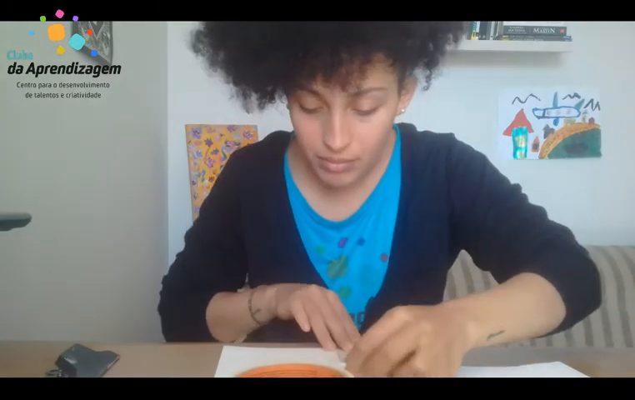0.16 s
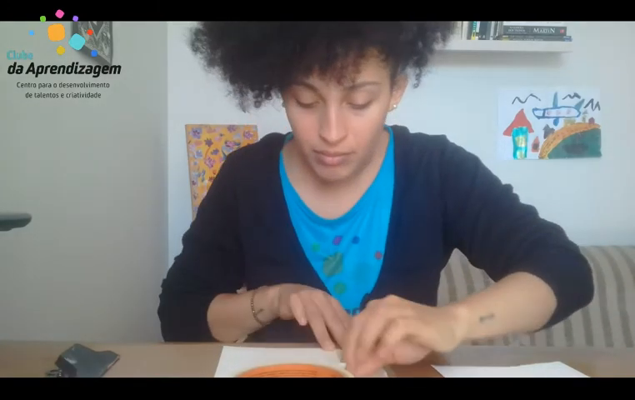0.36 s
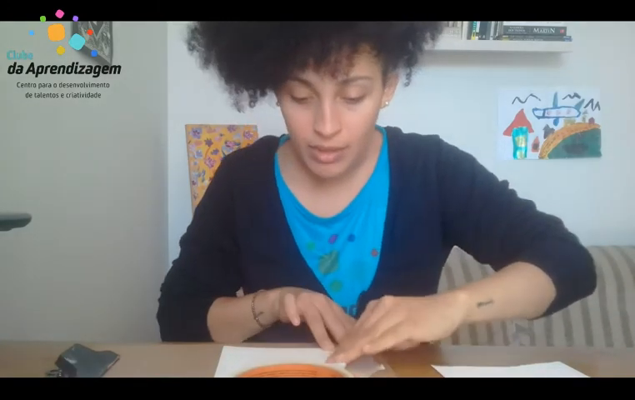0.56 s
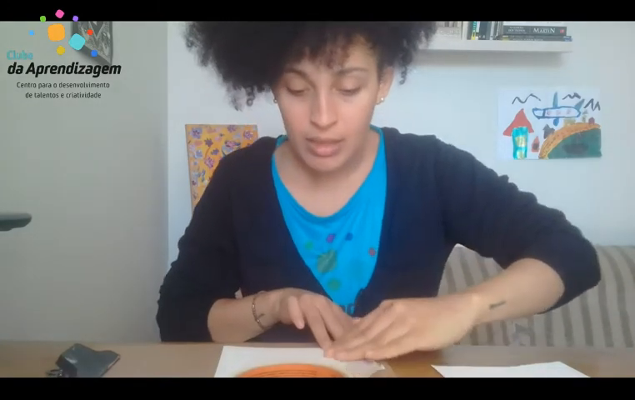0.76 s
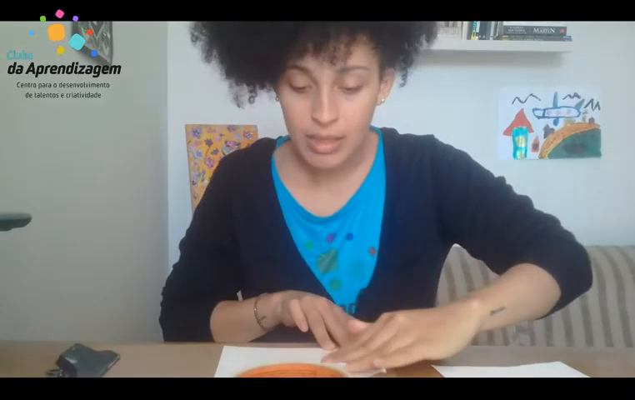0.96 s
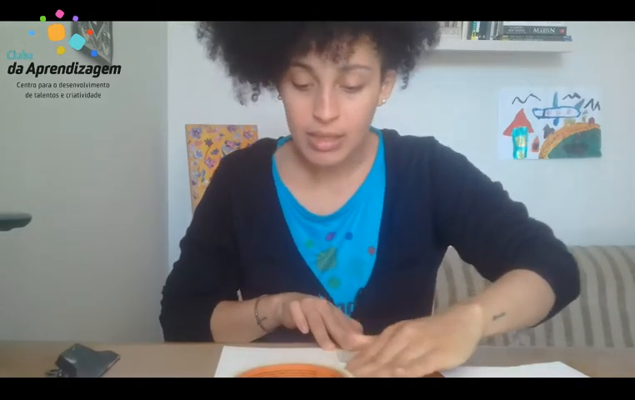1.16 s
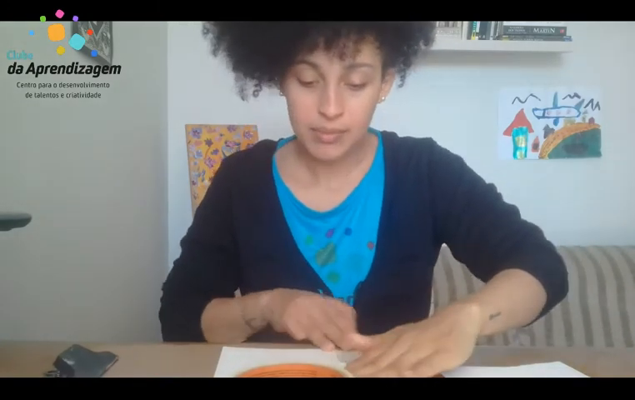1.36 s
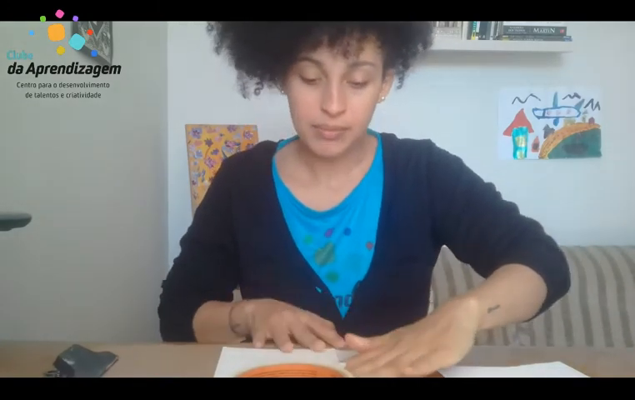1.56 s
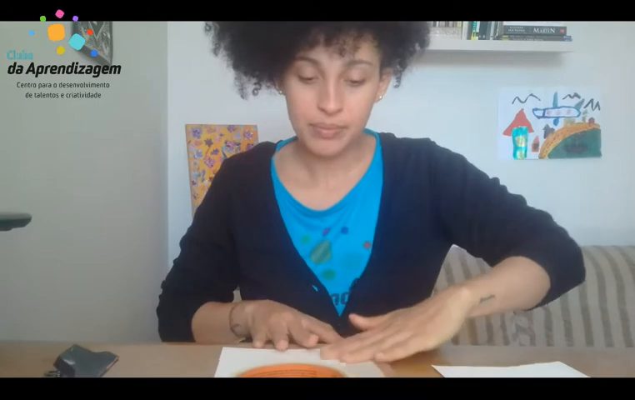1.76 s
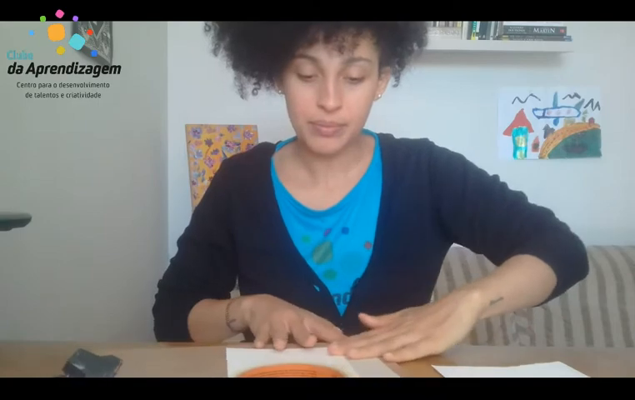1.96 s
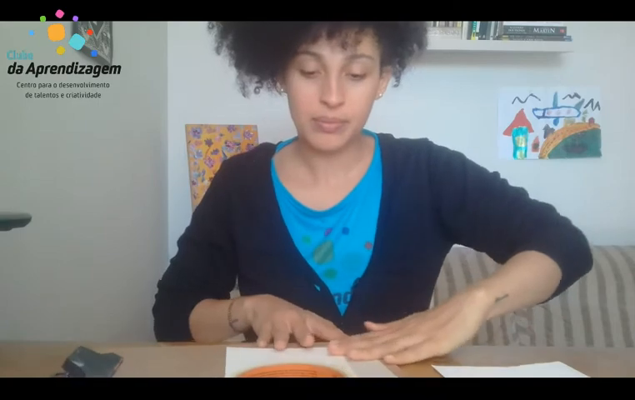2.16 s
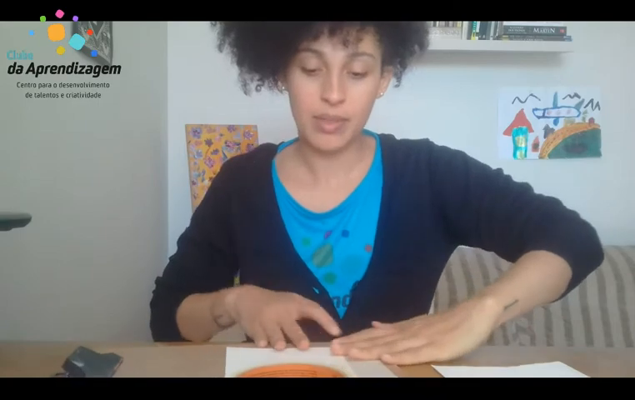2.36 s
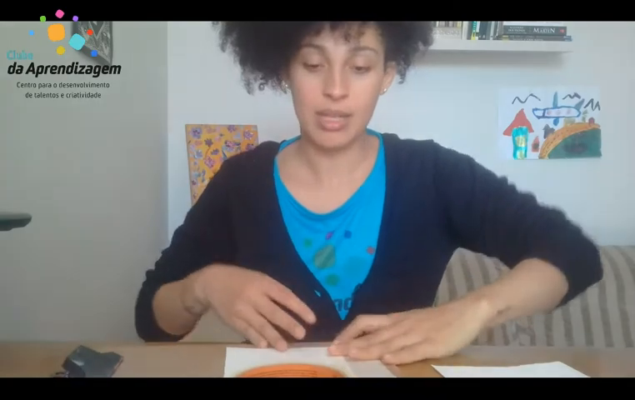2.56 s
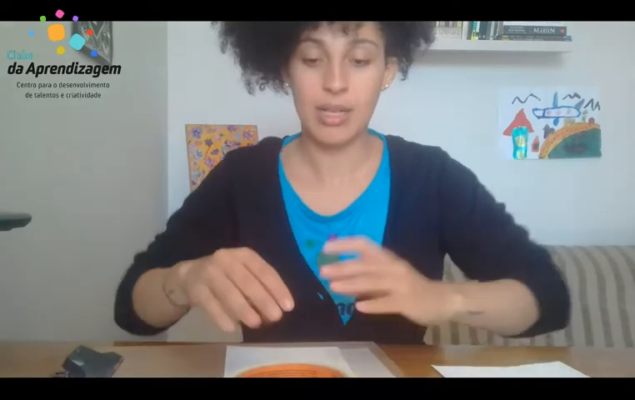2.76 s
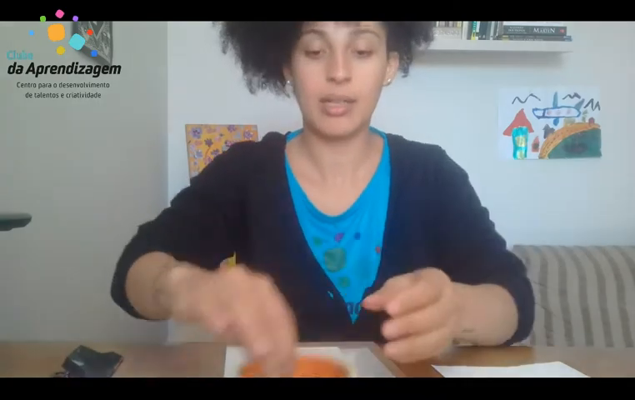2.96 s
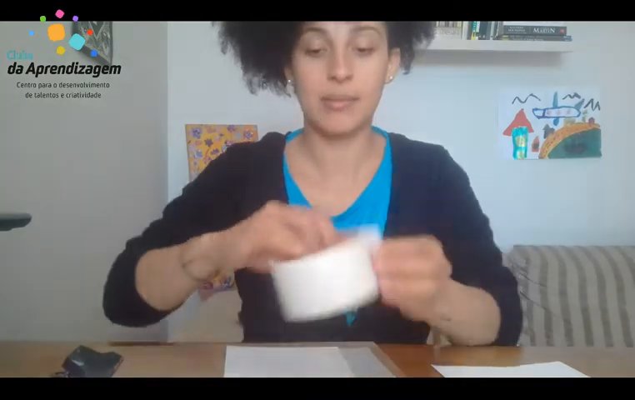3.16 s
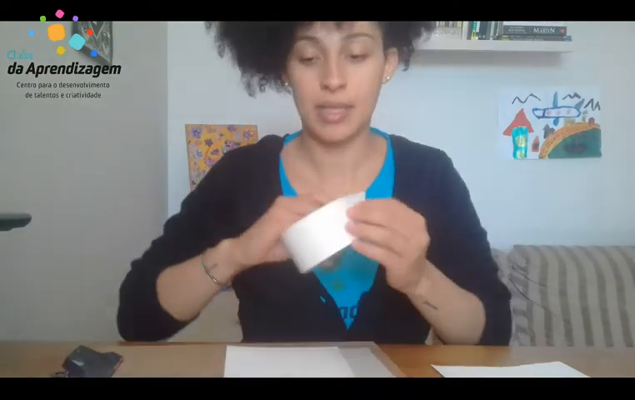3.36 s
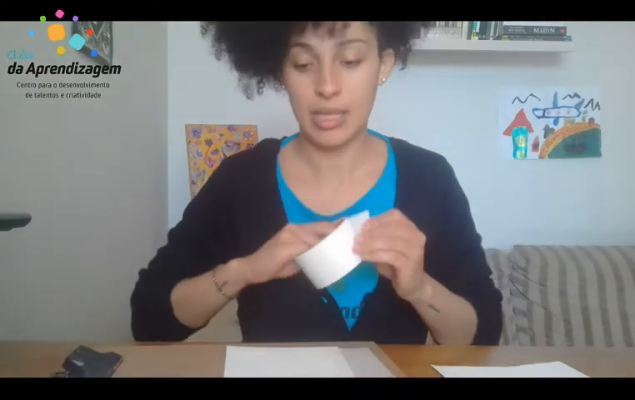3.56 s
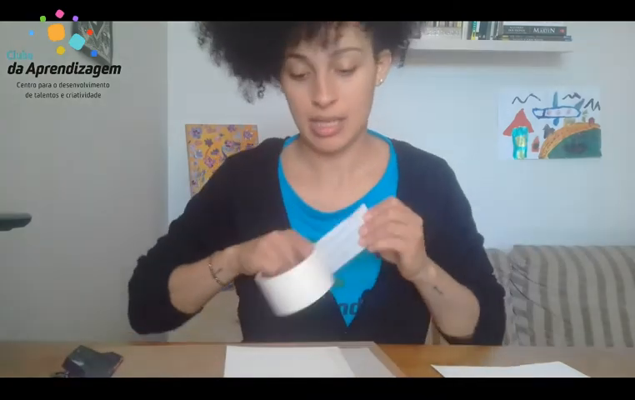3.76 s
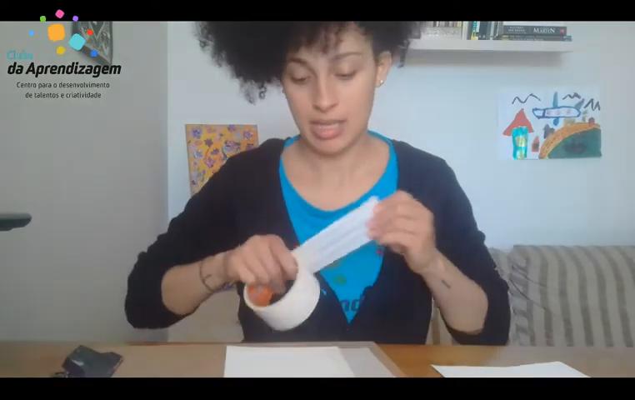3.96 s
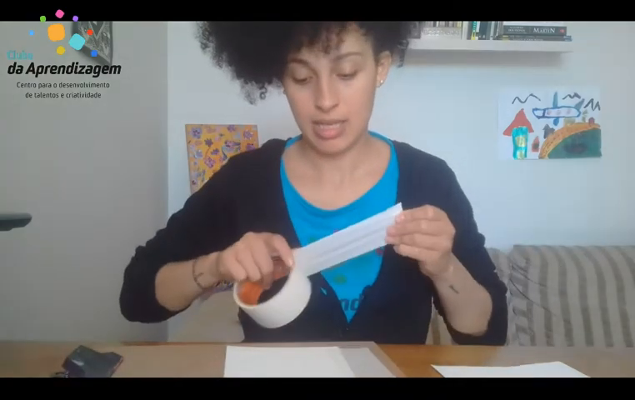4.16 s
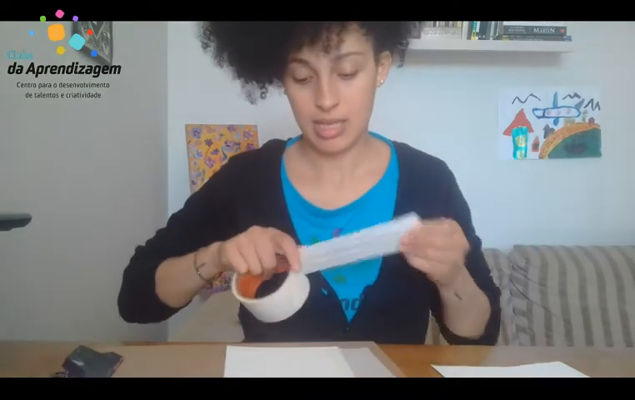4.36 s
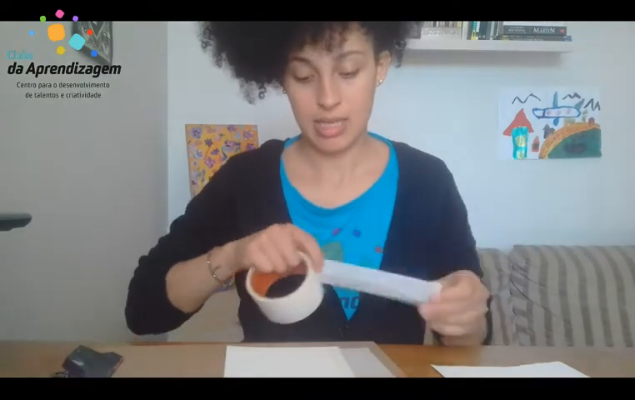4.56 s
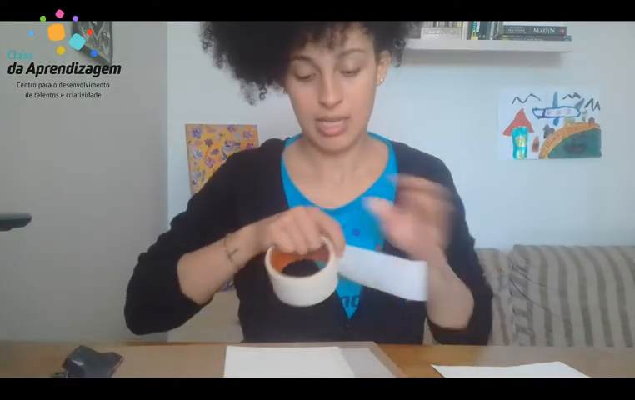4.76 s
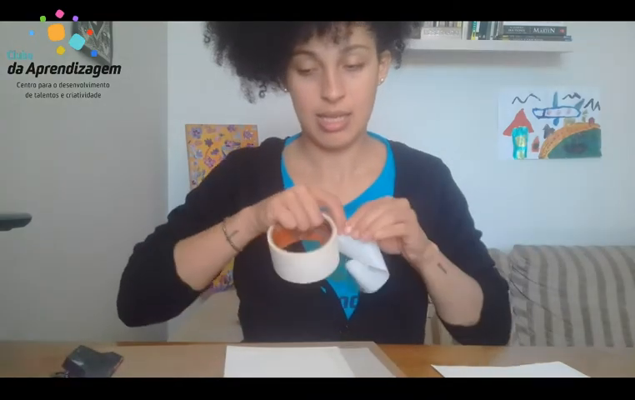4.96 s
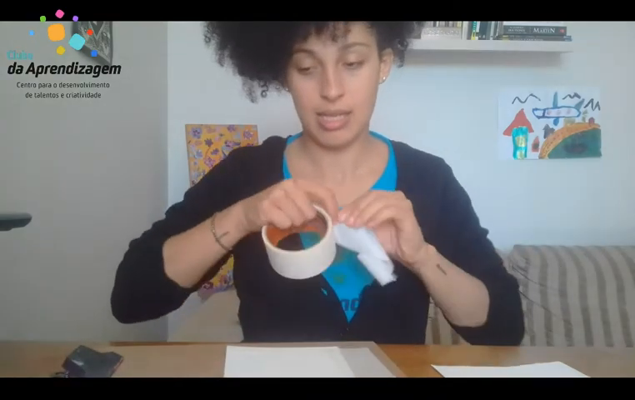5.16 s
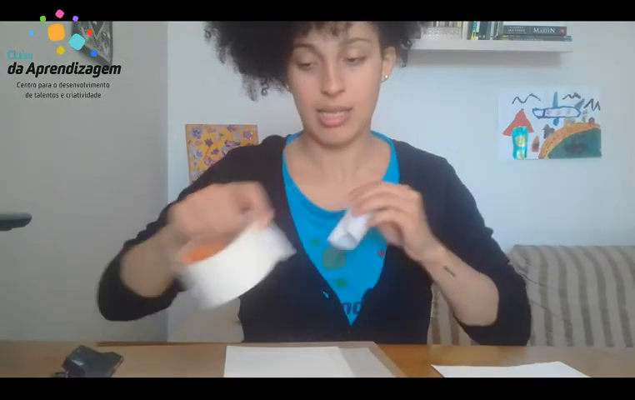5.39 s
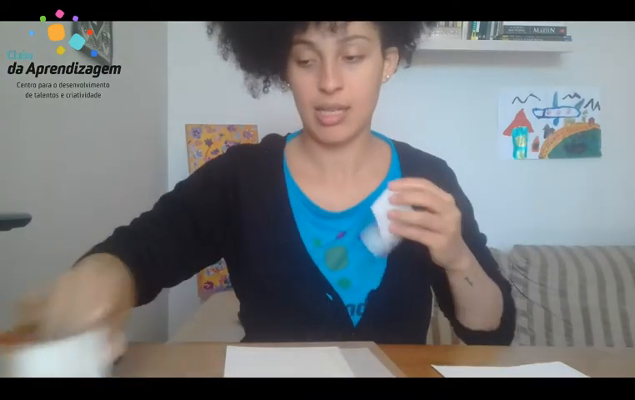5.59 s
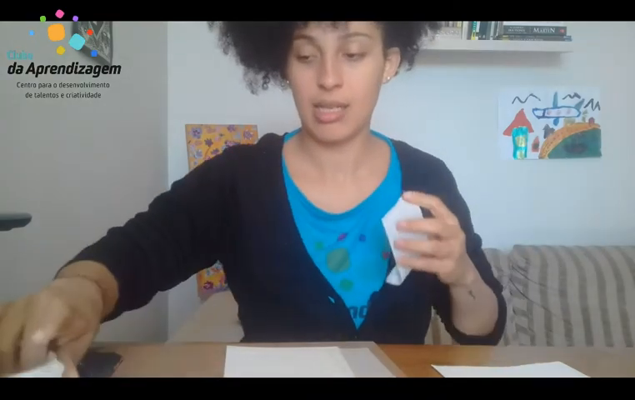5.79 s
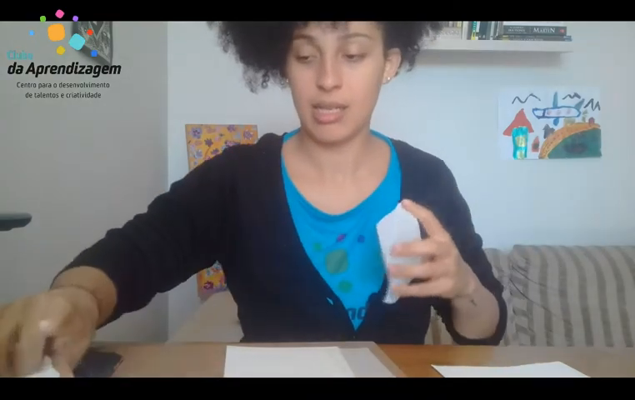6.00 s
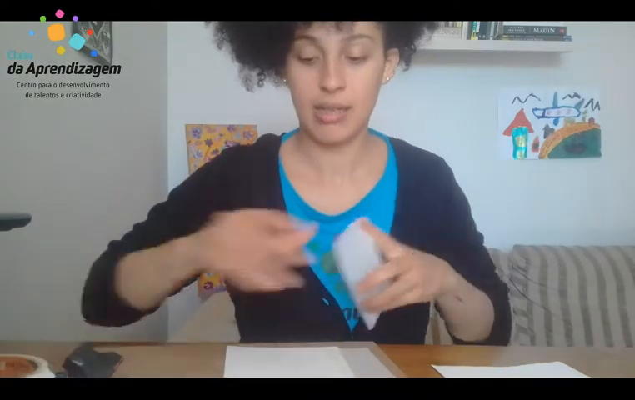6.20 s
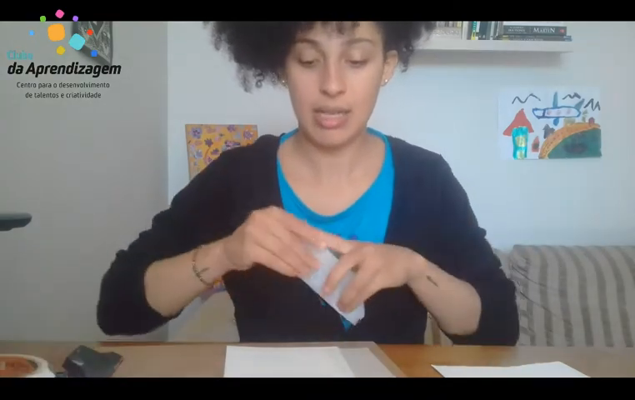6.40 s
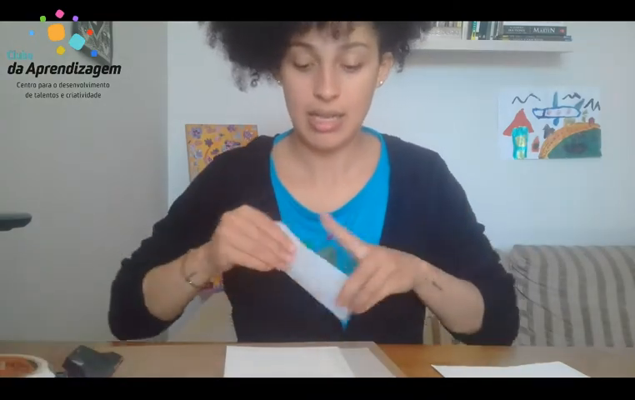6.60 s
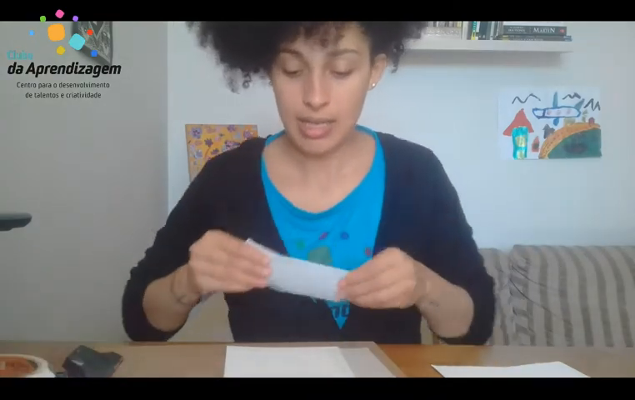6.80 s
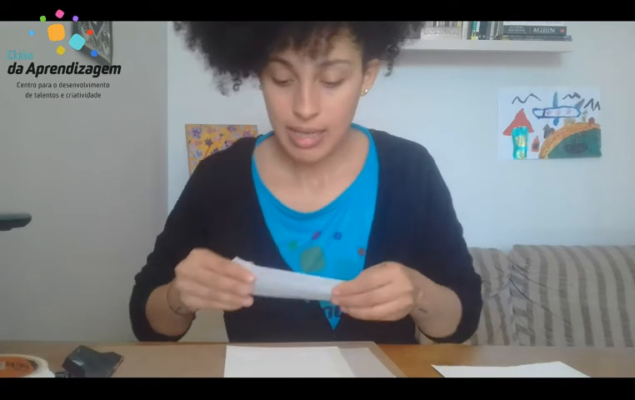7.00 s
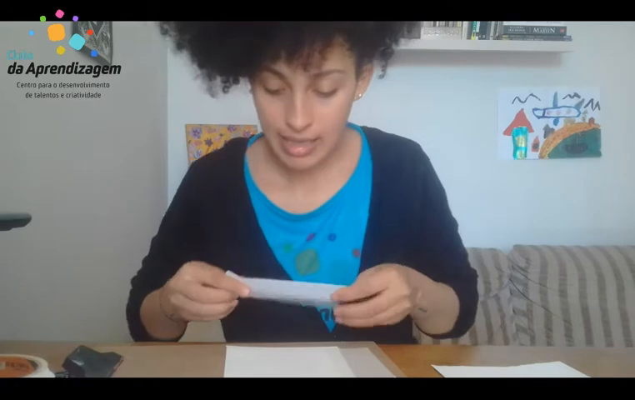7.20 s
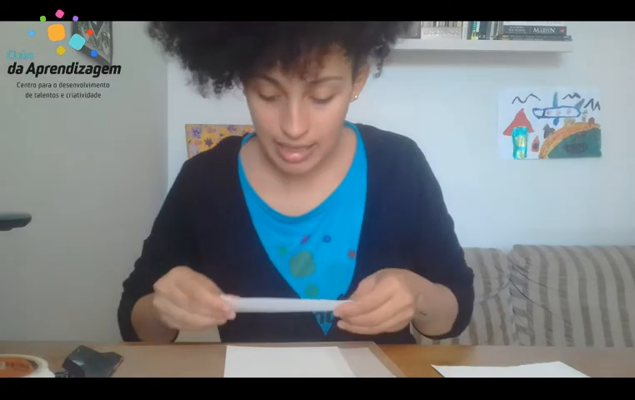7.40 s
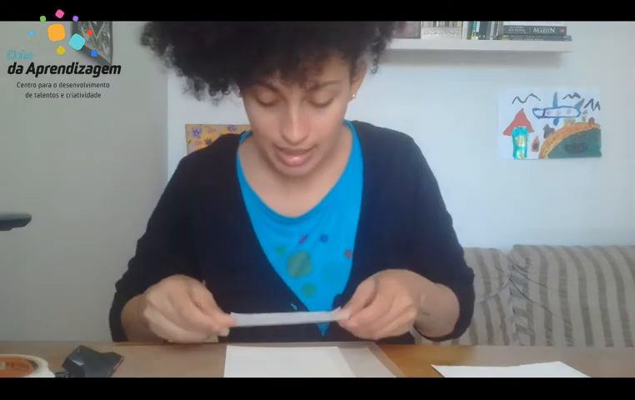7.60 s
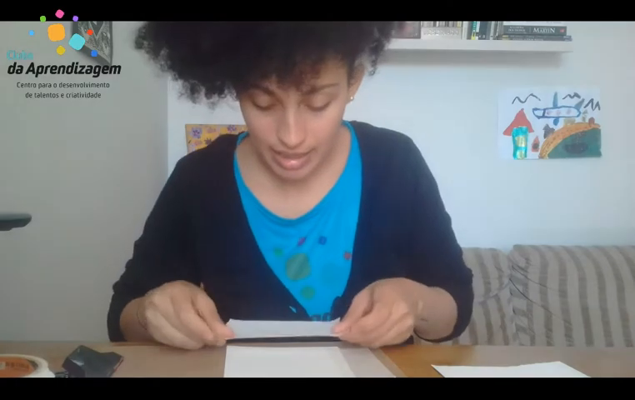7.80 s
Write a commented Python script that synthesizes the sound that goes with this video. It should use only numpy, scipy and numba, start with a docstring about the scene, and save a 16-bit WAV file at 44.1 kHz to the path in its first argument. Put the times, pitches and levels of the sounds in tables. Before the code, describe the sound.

Close, dry sound in a small room. Fingers smooth tape on paper with short hissing strokes and small snaps. A roll is picked up with a knock, a strip is peeled off in a loud rasp falling in pitch, sharp clicks lead to a quick tear, the roll rattles down on the desk, and the loose strip crackles in the hands.

```python
"""Fingers rub a strip of wide tape down on paper in a small room, in hissing strokes of filtered grains with snaps.
The roll is picked up with a knock; a length is peeled off with a rasp, grains driving strip modes that fall in pitch.
Sharp clicks of buckling film lead to a tear, a run of tiny snaps. The roll is then put down with a few knocks,
rung through its modes, while the loose strip crackles between the hands. Treble peaks near 9 kHz; nearly mono."""
import sys
import numpy as np
from scipy import signal
from scipy.fft import rfft, irfft
from scipy.io import wavfile
from scipy.ndimage import uniform_filter1d
from numba import njit

SR = 44100
rng = np.random.default_rng(int(sys.argv[2]) if len(sys.argv) > 2 else 0)


def materialize(psi):
    """Save the field psi as 16-bit PCM at rate SR to the path in sys.argv[1].

    A 1-D psi becomes a single channel; in a 2-D psi each row is a channel.
    """
    bounded = np.clip(np.atleast_2d(psi).T, -1, 1)
    quanta = np.round(bounded * 32767).astype(np.int16)
    wavfile.write(sys.argv[1], SR, quanta)


N = 345769
TIME = np.arange(N) / SR

# crisp colour of creasing film: f/Hz, relative density/dB
CREASE_SPECTRUM = [(2200, -17), (3500, -14), (4600, -17.5), (6600, -9), (7600, -6.5), (9000, 3),
                   (10000, 0.5), (11200, -8.5), (12900, -18), (14800, -21.5)]
# lower colour of the shivering sheet: f/Hz, relative density/dB
SHEET_SPECTRUM = [(150, -22.5), (350, -2.5), (600, -0.5), (1000, -1), (1800, 4), (2800, -1), (4500, -8.5),
                  (7000, -14), (12000, -30)]


def from_db(db):
    """Decibels to gain."""
    return 10 ** (np.asarray(db) / 20)


def rms_one(x):
    """Scale to rms 1."""
    return x / np.sqrt(np.mean(x ** 2) + 1e-20)


def curve(rows, axis):
    """One column of a table, joined by straight lines in time."""
    rows = np.array(rows)
    return np.interp(TIME, rows[:, 0], rows[:, axis])


def level(rows, axis):
    """A dB column as gain, silent outside its rows."""
    active = (TIME >= rows[0][0]) * (TIME < rows[-1][0])
    return from_db(curve(rows, axis=axis)) * active


def colour(x, spectrum):
    """Minimum-phase filter of unit energy with the given spectrum, falling away past its ends."""
    hz, db = np.transpose(spectrum)
    size = 8192
    octave = np.log2(np.maximum(np.fft.rfftfreq(size, 1 / SR), 1))
    outside = np.abs(octave - np.clip(octave, np.log2(hz[0]), np.log2(hz[-1])))
    shape_db = np.interp(octave, np.log2(hz), db) - np.minimum(24 * outside, 70)
    # folding the cepstrum makes the response causal
    cepstrum = irfft(np.log(from_db(shape_db)))
    cepstrum[1:size // 2] *= 2
    cepstrum[size // 2 + 1:] = 0
    response = irfft(np.exp(rfft(cepstrum)))[:size // 2]
    return signal.oaconvolve(x, response / np.linalg.norm(response))[:N]


def grains(per_s, spread_db):
    """Tiny slips at random moments, a few much larger than the rest; rms 1."""
    sizes = from_db(spread_db * np.minimum(rng.exponential(1, N), 4))
    signs = rng.choice([-1, 1], N)
    return rms_one(sizes * signs * (rng.random(N) < per_s / SR))


def flutter(per_s, depth_db):
    """Random unevenness of a gain."""
    knots = rng.standard_normal(8000)
    return from_db(depth_db * np.interp(TIME * per_s, np.arange(len(knots)), knots))


def add(track, s, sound):
    """Mix a short sound into a track at a time."""
    at = round(s * SR)
    track[at:at + len(sound)] += sound[:N - at]


def movement(start, length):
    """Speed of one hand movement: it swells, holds and eases off."""
    swell_share, ease_share, ramp_power = 0.56, 0.23, 1.17
    out = np.zeros(N)
    span = slice(round(start * SR), round((start + length) * SR))
    part = (TIME[span] - start) / max(length, .01)
    ramps = np.minimum(part / swell_share, (1 - part) / ease_share)
    out[span] = np.clip(ramps, 0, 1) ** ramp_power
    return out


@njit
def resonate(x, hz, width):
    """A moving resonance that keeps the power of white noise."""
    out, state = np.zeros(len(x)), 0j
    for i in range(len(x)):
        r = np.exp(-np.pi * width[i] / SR)
        state = state * r * np.exp(2j * np.pi * hz[i] / SR) + x[i] * np.sqrt(2 * (1 - r * r))
        out[i] = state.imag
    return out


def sing(hz, share):
    """Friction drives a moving resonance; the skirts are steep and the level is held even."""
    tone = resonate(grains(6000, 3.0), hz, hz * share)
    tone = resonate(tone, hz, hz * share * 1.5)
    return tone / np.sqrt(np.abs(uniform_filter1d(tone ** 2, size=1300)) + 1e-12)


def rubbing():
    """Skin slides over tape and paper fibres, and the hollow of the hand rings with it."""
    # finger strokes: start/s, length/s, effort/dB, paper pressure relative to effort/dB
    strokes = [(0.108, 0.074, -69, -23), (0.387, 0.44, -50.5, -11.5), (0.408, 0.061, -71, -2),
               (.79, 0.022, -74, 17), (0.864, 0.066, -54, -4.5), (0.873, 0.2, -58.5, -4),
               (0.968, 0.28, -50, -9), (1.213, .11, -58, -3.5), (1.619, 0.26, -45, -9.5),
               (1.826, .17, -51.5, -2), (2.109, 0.13, -64.5, 1.5), (2.262, 0.095, -67.5, -1.5),
               (2.682, .08, -65, -22)]
    # colours: f/Hz, relative density/dB
    hiss_spectrum = [(2000, -29), (3200, -28), (4700, -30), (5800, -12), (7200, -7.5), (8400, 0.5),
                     (9500, 6.5), (10600, -2), (12500, -11), (14000, -18), (15800, -21)]
    body_spectrum = [(200, -11), (450, -4), (800, 2), (1600, 5), (2600, -0.5), (4000, -3.5), (5500, -4)]
    scuff_spectrum = [(1500, -12), (2700, -4), (4600, -5.5), (6500, -10)]
    # hollow under the sliding hand: t/s, resonance f/Hz
    hollow_track = [(.5, 1800), (.78, 1480), (.9, 1020), (.96, 884), (1.19, 785), (1.3, 910)]
    hollow_db = -2  # relative to pressure
    grip, effort, pressure = flutter(70, 0.55), 0, 0
    for start, length, db, body_db in strokes:
        stroke = from_db(db) * movement(start, length)
        effort = effort + stroke
        pressure = pressure + from_db(body_db) * stroke
    hiss = from_db(-2.9) * effort * colour(grip * grains(11000, 3.0), hiss_spectrum)
    body = from_db(-2.35) * pressure * colour(grip * grains(6000, 3.9), body_spectrum)
    # the power favours hard strokes, which drag the fibres into a coarse scuff
    scuff = from_db(20.5) * effort ** 1.664 * colour(grip * grains(3000, 2.9), scuff_spectrum)
    cupped = (TIME > hollow_track[0][0]) * (TIME < hollow_track[-1][0])
    ringing = sing(curve(hollow_track, axis=1), share=0.33)
    hollow = from_db(hollow_db) * cupped * pressure * ringing
    return hiss + body + scuff + hollow


def room(x):
    """Diffuse echoes build up once the walls answer and die soonest at the very top."""
    # echo bands: f/Hz, t60/s, relative echo level/dB
    bands = [(144, 0.45, -1.5), (464, 0.29, -1.5), (1436, 0.37, -7.5), (3700, 0.39, -6.5), (9700, 0.27, -8),
             (14240, .22, -3.5)]
    age = np.arange(SR // 2) / SR
    hz, t60_s, db = np.transpose(bands)
    white = rfft(rng.standard_normal(len(age)))
    log_hz = np.log(np.maximum(np.fft.rfftfreq(len(age), 1 / SR), 1))
    response = 0
    for share, decay_s, gain in zip(np.eye(len(hz)), t60_s, from_db(db)):
        band = irfft(white * np.interp(log_hz, np.log(hz), share), len(age))
        fade = from_db(-60 * age / decay_s) * np.clip((age - .002) / 0.005, 0, 1)
        response = response + gain * band * fade / np.linalg.norm(fade)
    return signal.oaconvolve(x, response)[:N]


def rebounds(length):
    """A unit blow spread by allpasses into a quick train of fading rebounds, equally strong at all pitches."""
    blow = np.zeros(2000)
    blow[0] = 1
    for lag in rng.uniform(.12, .4, 3) * np.clip(length, .0005, .012) * SR:
        taps = np.r_[-.55, np.zeros(int(lag)), 1]
        blow = signal.lfilter(taps, taps[::-1], blow)
    return blow


def snapping():
    """The film buckles: a sharp click at the crease and a very short shiver of the sheet around it."""
    # single snaps: t/s, relative level/dB, relative weight of the sheet/dB
    snap_rows = [(0.751, -35, 7), (1.4523, -47.5, 11.5), (1.5747, -49, 13), (2.411, -39.5, -21),
                 (3.1566, -33.5, -4), (3.3468, -27, -8), (3.4048, -33, -22), (3.4123, -14.5, -13.5),
                 (3.5534, -26.5, -12), (4.587, -31, 8), (4.634, -31.5, 2), (4.6539, -23, -3),
                 (4.6717, -10, -6), (4.8887, -51, 2.5), (4.9264, -45, 3), (4.9836, -37, 9),
                 (5.035, -39.5, 6), (5.0595, -44, 15.5), (5.0868, -36, 4), (5.3194, -18, -3),
                 (5.45, -24, -13), (5.5007, -22, -1), (5.6137, -11.5, -13.5), (5.7238, -7.5, 3),
                 (6.5267, -48, 18.5), (6.6016, -25.5, 6.5), (6.636, -27.5, 0.5), (6.686, -39.5, 16),
                 (6.9431, -34, -4), (7.0749, -16, -2.5), (7.0945, -24, -12), (7.22, -46.5, 13.5),
                 (7.2967, -20, -8)]
    crease, sheet = np.zeros(N), np.zeros(N)
    for s, db, body_db in snap_rows:
        add(crease, s, from_db(db + 4.5) * rebounds(0.00081))
        add(sheet, s, from_db(db + body_db - 4.5) * rebounds(0.0025))
    return colour(crease, CREASE_SPECTRUM) + colour(sheet, SHEET_SPECTRUM)


def ripping():
    """A crack or crease runs across the film as a run of tiny snaps; crumples swell, then stop dead."""
    # short crumples: start/s, length/s, final level/dB, swell/dB, sheet relative to edge/dB
    crumples = [(1.561, 0.026, -63, 4.5, 2.5), (4.582, 0.017, -46, 22, -12), (4.649, 0.02, -30.5, 19.5, -7),
                (4.968, 0.0043, -65, 14, 11), (5.586, 0.02, -45, 9.5, -5), (5.718, 0.066, -47.5, 8, 6),
                (5.818, .021, -46, 2, -6), (6.567, 0.057, -52, 12, -2.5), (6.629, .012, -34, 23, -10),
                (7.07, 0.0084, -32.5, 6, -29), (7.536, .027, -48.5, 9.5, -5)]
    # strip torn across its width: t/s, edge crackle level/dB, sheet level/dB
    tear = [(5.279, -53, -57.5), (5.283, -39, -44.5), (5.3, -26, -37), (5.314, -26, -44.5),
            (5.321, -21, -38.5), (5.329, -25, -29), (5.337, -31.5, -33), (5.347, -19, -46),
            (5.352, -30.5, -60)]
    # torn sheet: f/Hz, relative density/dB
    sheet_spectrum = [(200, -22), (400, -11), (600, -2), (1000, -2), (1900, 4.5), (2800, 4.5), (3600, -2),
                      (4600, 1), (6000, -3.5), (9000, -6.5)]
    edge, sheet = np.array([grains(9000, 2.4), grains(9000, 2.0)]) * flutter(450, 2.0)
    top = edge * level(tear, axis=1)
    body = sheet * level(tear, axis=2)
    for s, length, db, swell_db, body_db in crumples:
        span = slice(round(s * SR), round((s + max(length, .002)) * SR))
        swell = from_db(db + swell_db * np.linspace(-1, 0, span.stop - span.start))
        top[span] += swell * rms_one(edge[span])
        body[span] += swell * rms_one(sheet[span]) * from_db(body_db)
    return colour(top, CREASE_SPECTRUM) + colour(body, sheet_spectrum)


def thumping():
    """A palm or the roll pushes the desk top, whose low mode swells and fades, detuned a little each time."""
    # soft thumps: t/s, level/dB, nominal fade/s
    thump_rows = [(1.571, -48, 0.014), (1.592, -46, 0.0045), (2.975, -63, 0.0066), (3.047, -62.5, 0.016),
                  (5.75, -62, 0.014), (5.928, -64, 0.0084), (6.169, -62, 0.013)]
    desk_hz = 145  # before detuning
    out = np.zeros(N)
    for (s, db, fade_s), detune in zip(thump_rows, rng.uniform(0.884, 1.126, len(thump_rows))):
        age = np.maximum(TIME - s, 0)
        swell = age / np.clip(fade_s, .005, .05)
        out += from_db(db) * swell * np.exp(1 - swell) * np.sin(2 * np.pi * desk_hz * detune * age)
    return signal.sosfilt(signal.butter(4, 115, "high", fs=SR, output="sos"), out + 1e-18)


def rustling():
    """Sparse crinkles and a few stray ticks while the fingers shift on the tape."""
    # finger shifts on loose tape: start/s, length/s, effort/dB
    shifts = [(2.961, 0.034, -55), (3.12, 0.13, -64), (3.28, 0.1, -68), (4.957, 0.066, -49.5),
              (5.076, 0.078, -57), (5.38, 0.13, -48), (5.591, 0.1, -46), (5.818, 0.19, -60),
              (5.974, 0.17, -54), (6.137, 0.05, -48), (6.459, 0.078, -58), (6.613, .11, -57),
              (6.8, 0.22, -55), (6.995, 0.08, -49.5), (7.3, 0.1, -65)]
    # faint fiddling once the roll is in the hands
    idle_db, idle_from_s, idle_until_s = -68.5, 3.15, 7.68
    ticks_per_s, tick_crease_db, tick_sheet_db = 38, -18.5, -21.5  # levels relative to effort
    idle = from_db(idle_db) * (TIME > idle_from_s) * (TIME < idle_until_s)
    idle = idle * flutter(18, 3.5)
    effort = sum(from_db(db) * movement(start, length) for start, length, db in shifts)
    handling = flutter(90, 0.71) * (idle + effort)
    ticks = grains(ticks_per_s, 2.0)
    crease = from_db(-7.5) * grains(3000, 4.6) + from_db(tick_crease_db) * ticks
    sheet = from_db(-16.5) * grains(1100, 1.6) + from_db(tick_sheet_db) * ticks
    return colour(handling * crease, CREASE_SPECTRUM) + colour(handling * sheet, SHEET_SPECTRUM)


def rocking(count):
    """Once laid down, the roll rocks to rest in ever duller contacts, as rows like those of the knocks."""
    start_s, gap_s, contact_s = 5.761, .019, .009
    first_db, rise_db, bright_hz, dulling = -18, 1, 2650, 0.65  # rise and dulling per contact
    return [(start_s + gap_s * (k + slip), first_db + rise_db * k, bright_hz * dulling ** k, contact_s)
            for k, slip in enumerate(rng.uniform(-0.197, 0.206, count))]


def knocking():
    """Each blow is a brief chatter of contacts, dulled by its softness, ringing the cardboard core and desk."""
    # roll and hands on the desk: t/s, relative strength/dB, contact brightness f/Hz, contact length/s
    knock_rows = [(3.042, -4.5, 2580, 0.0034), (5.721, -19, 2600, 0.0047), (5.752, -12.5, 1290, 0.0066),
                  (5.929, -10.5, 810, 0.0033), (6.165, -7.5, 1610, .0067), (6.472, -30.5, 2820, 0.0034),
                  (7.293, -31.5, 713, 0.0023)]
    # modes: f/Hz, width/Hz, relative level/dB
    modes = [(278, 59, -9), (422, 104, -1), (610, 200, -5.5), (785, 470, -2), (920, 120, 2.5),
             (1090, 360, 1), (1490, 49, 3.5), (1657, 49, 2.5), (1940, 190, -35), (2700, 50, -9),
             (2910, 92, 0.5)]
    force = np.zeros(N)
    for s, db, bright_hz, length in knock_rows + rocking(count=5):
        top_hz = min(bright_hz, SR / 3)
        dull = signal.butter(3, top_hz, fs=SR, output="sos")
        # a hard, glancing contact also carries less of a low push
        lean = signal.butter(2, top_hz * 0.15, "high", fs=SR, output="sos")
        blow = signal.sosfilt(np.vstack([dull, lean]), rebounds(length))
        add(force, s, from_db(db + 16.5) * blow)
    # the damped desk board answers with a broad thud under the modes
    thud_spectrum = [(120, -14), (260, -16), (360, -0.5), (500, 4.5), (1500, 1.5), (2800, 0), (4200, -26)]
    out = from_db(-22) * colour(force, thud_spectrum)
    for hz, width_hz, db in modes:
        r = np.exp(-np.pi * width_hz / SR)
        poles = [1, -2 * r * np.cos(2 * np.pi * hz / SR), r * r]
        out += from_db(db - 10) * (1 - r * r) / 2 * signal.lfilter([1, 0, -1], poles, force + 1e-18)
    return signal.sosfilt(signal.butter(4, 3300, fs=SR, output="sos"), out)


def peeling():
    """Threads of glue let go in a stream, louder with speed, and shake the film and the lengthening strip."""
    # creep, fast tug, slower draw off the roll: t/s, speed/(m/s)
    pull_track = [(3.42, 0.0062), (3.61, 0.026), (3.68, 0.1), (3.75, 0.49), (3.89, 0.61), (3.98, 0.4),
                  (4.05, 0.14), (4.17, 0.2), (4.22, 0.34), (4.25, 0.14), (4.36, 0.1), (4.5, 0.0066),
                  (4.58, 0.0028)]
    # strip modes: multiple of the lowest, relative width, relative level/dB
    modes = [(1, 0.11, 0), (1.8, 0.32, -11), (3.3, 0.1, -6)]
    # how well strip and roll radiate a mode: f/Hz, gain/dB
    radiation = [(220, -5), (310, -15.5), (430, -6), (720, 4.5), (1150, -4.5), (1600, 0), (2100, 2),
                 (2700, -24)]
    # colours: f/Hz, relative density/dB
    crackle_spectrum = [(1880, -20), (3200, -18), (3580, -10.5), (4040, -18), (4780, -10.5), (5180, -14),
                        (5840, -7.5), (6950, -7.5), (9140, 3.5), (13500, -18), (15200, -15), (15800, -33)]
    film_spectrum = [(130, -43), (250, -21), (500, -4.5), (1000, -3.5), (1500, 1), (2100, 4.5), (2700, 0),
                     (3400, -6), (5000, -6)]
    reference_m_per_s = 0.59
    # levels at the reference speed; powers of the speed
    crackle_db, crackle_power = -34.5, .62
    film_db, film_power = -35.5, 1.28
    strip_db, strip_power = -34, 1.49
    pops_per_s, pop_db = 110, -6.5  # coarse stick-slip, relative to the fine threads
    free_start_m, wave_m_per_s = 0.0198, 111  # free length before the pull; waves on the taut strip

    speed = np.maximum(np.interp(TIME, *np.transpose(pull_track), left=0, right=0), 0)
    pull = speed / reference_m_per_s
    jerks = flutter(260, 1.0) * flutter(35, 2.06)
    threads = grains(6000, 3.3) * jerks * pull ** crackle_power
    crackle = from_db(crackle_db) * colour(threads, crackle_spectrum)
    slips = grains(3000, 3.6) + from_db(pop_db) * grains(pops_per_s, 2.6)
    film = from_db(film_db) * colour(slips * jerks * pull ** film_power, film_spectrum)
    # the pitch falls as the free length grows, and staggers with the uneven tension
    free_length_m = free_start_m + np.cumsum(speed) / SR
    lowest_hz = wave_m_per_s / (2 * free_length_m) * flutter(150, .75)
    hz, radiated_db = np.transpose(radiation)
    strip = 0
    for multiple, share, db in modes:
        mode_hz = multiple * lowest_hz
        gain_db = db + np.interp(np.log(mode_hz), np.log(hz), radiated_db)
        strip = strip + from_db(gain_db) * sing(mode_hz, share)
    strip = from_db(strip_db) * pull ** strip_power * jerks * strip
    # the light film radiates almost no bass
    return signal.sosfilt(signal.butter(6, 180, "high", fs=SR, output="sos"), crackle + film + strip)


def scene():
    """Hands, tape and desk in the room, over a quiet floor; the two channels differ only by a trace."""
    # background noise: f/Hz, relative density/dB
    floor_spectrum = [(32, -33.5), (55, -3.5), (102, -1), (198, -2), (257, 1), (649, -5.5), (1200, -6.5),
                      (3190, -15), (5370, -20), (7670, -20.5), (9270, -14), (12000, -24.5), (14900, -21),
                      (16000, -38.5)]
    # faint noise of opposite sign in the two channels: f/Hz, relative density/dB
    side_spectrum = [(25, -19), (60, -21), (120, -6), (250, -6), (600, -10), (2000, -12.5), (5000, -20),
                     (15000, -24)]
    floor_db, side_db = -71, -75.5
    steady = rubbing() + peeling() + rustling() + thumping()
    snaps, rips, knocks = snapping(), ripping(), knocking()
    echoes = room(steady + snaps + from_db(1.0) * rips + from_db(2.5) * knocks)
    floor = from_db(floor_db) * colour(rng.standard_normal(N), floor_spectrum)
    mid = steady + snaps + rips + knocks + echoes + floor
    side = from_db(side_db) * colour(rng.standard_normal(N), side_spectrum)
    return np.array([mid + side, mid - side])


def record(dry):
    """The top is cut steeply; the converter rests slightly below zero."""
    cutoff_hz, offset = 15900, -.0005
    return signal.sosfilt(signal.ellip(12, .1, 80, cutoff_hz, fs=SR, output="sos"), dry) + offset


dry = scene()
out = record(dry)
materialize(out)
```